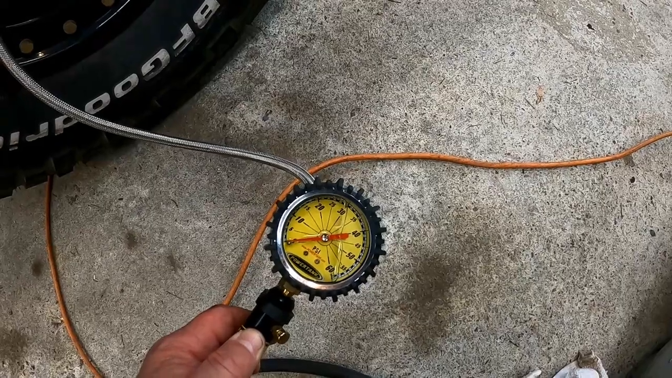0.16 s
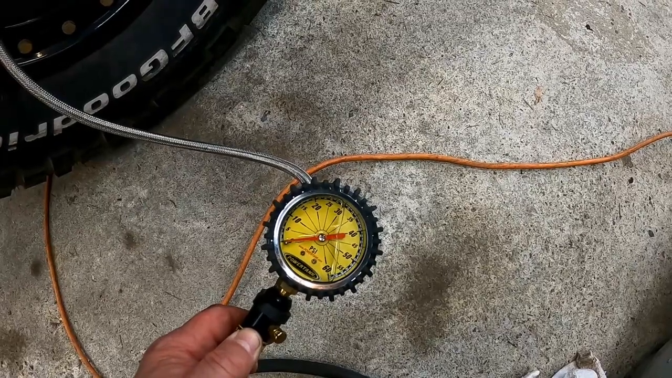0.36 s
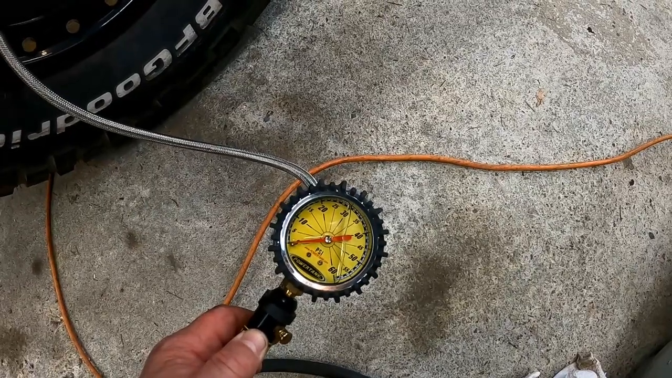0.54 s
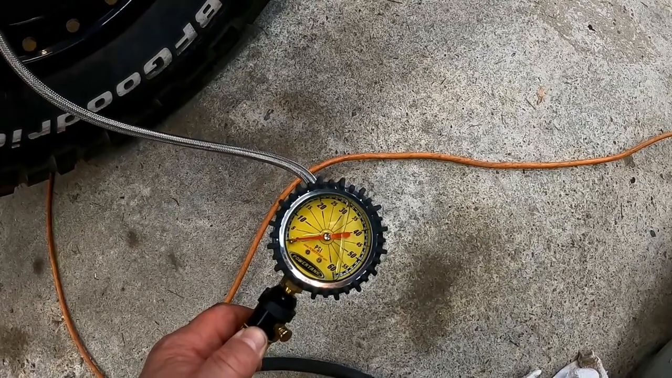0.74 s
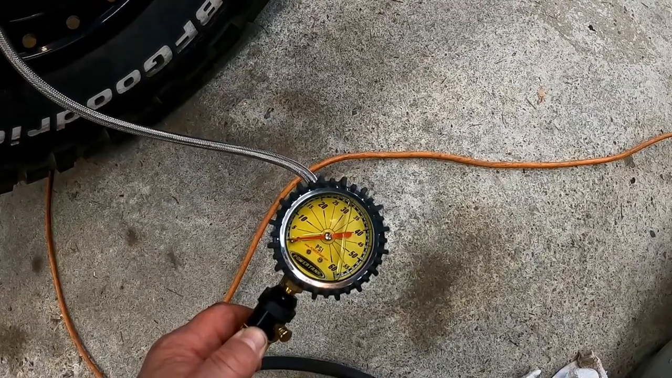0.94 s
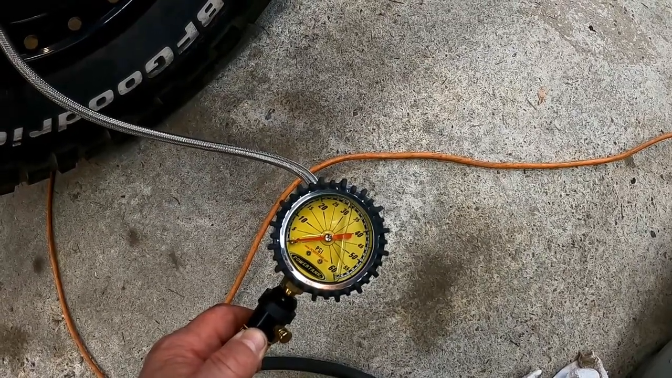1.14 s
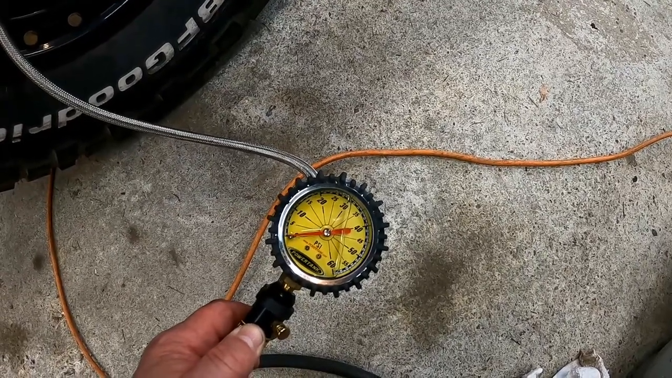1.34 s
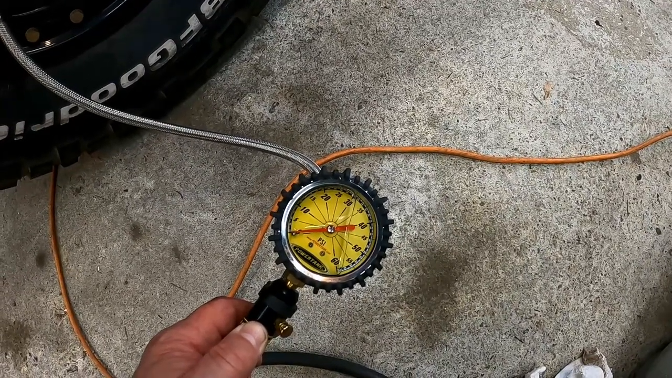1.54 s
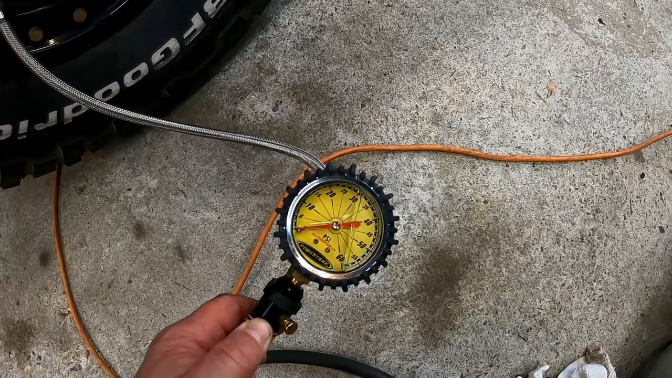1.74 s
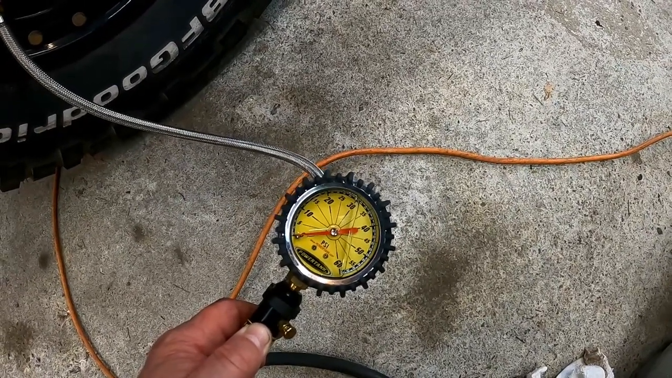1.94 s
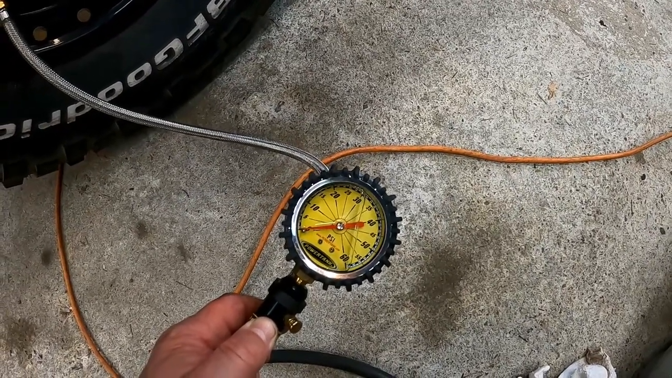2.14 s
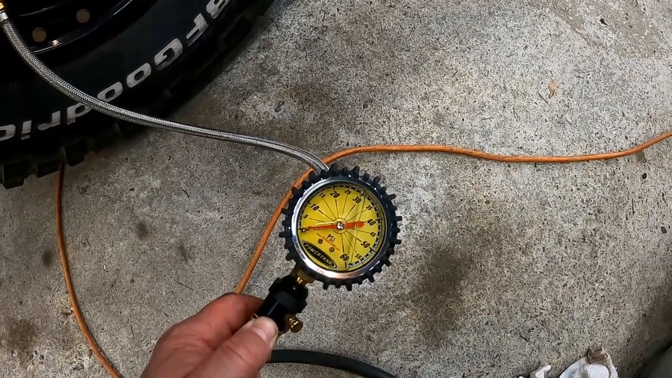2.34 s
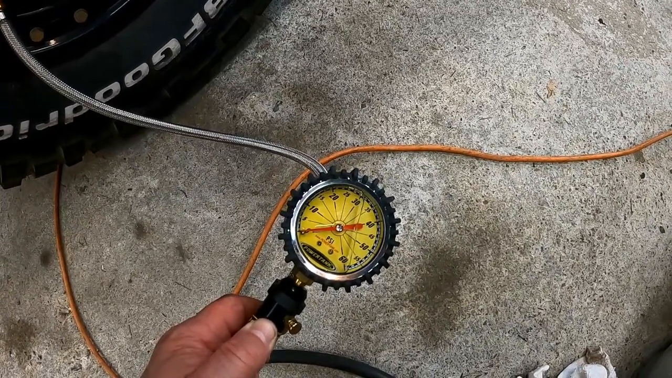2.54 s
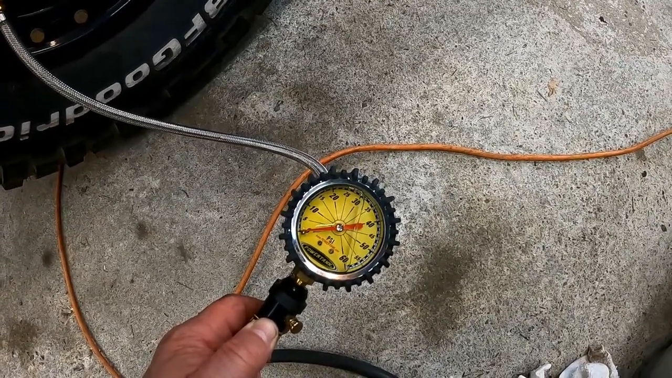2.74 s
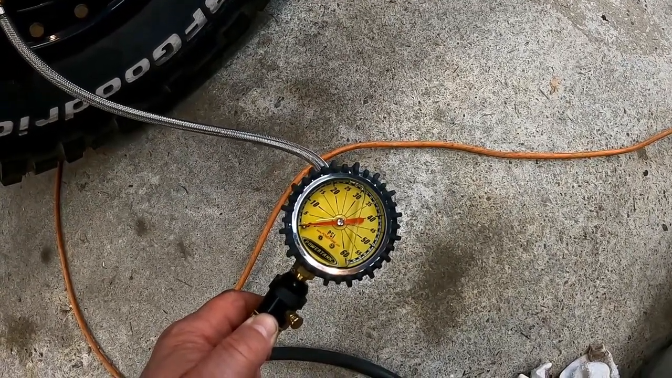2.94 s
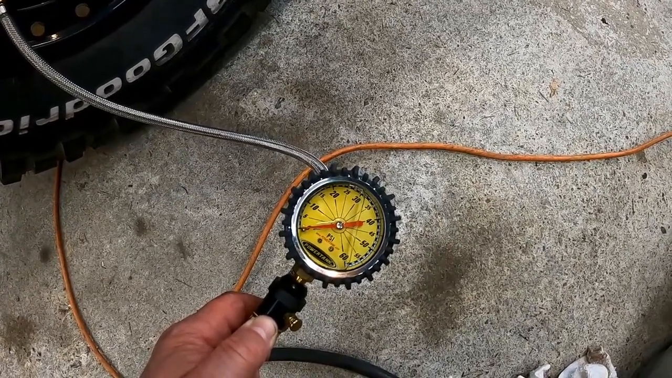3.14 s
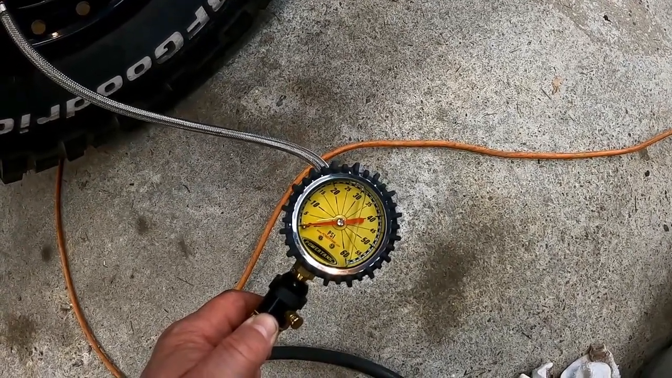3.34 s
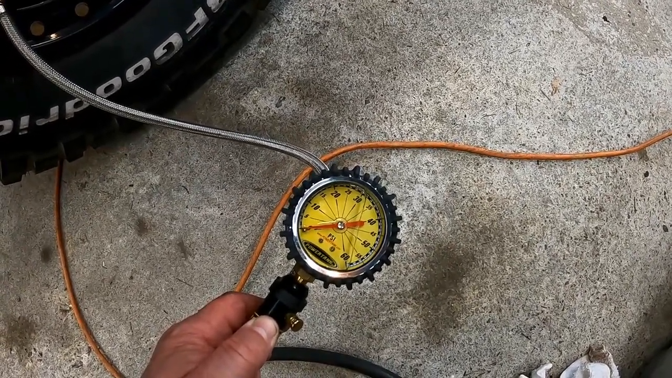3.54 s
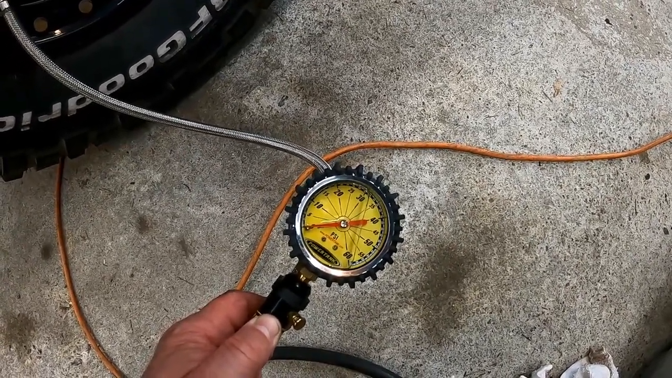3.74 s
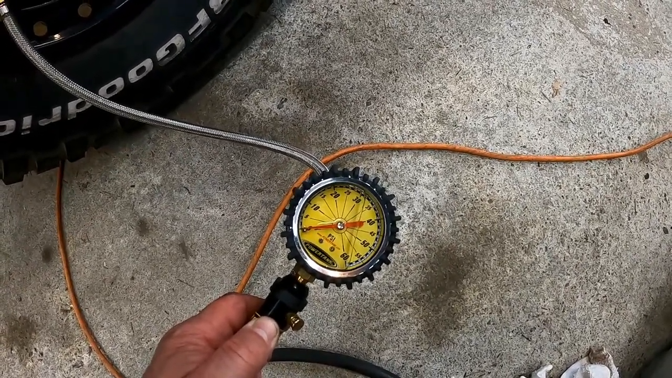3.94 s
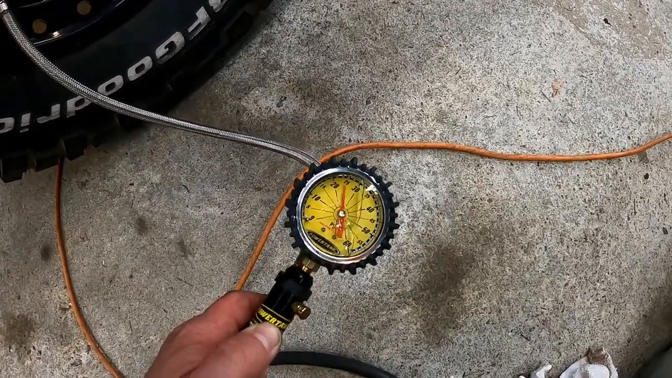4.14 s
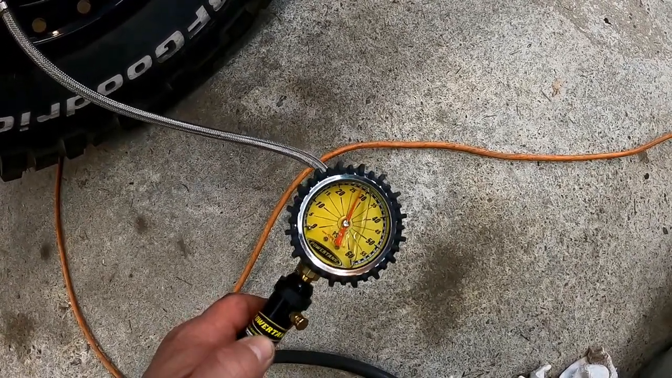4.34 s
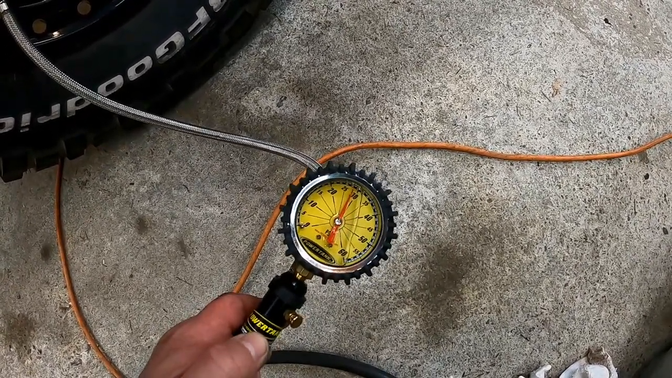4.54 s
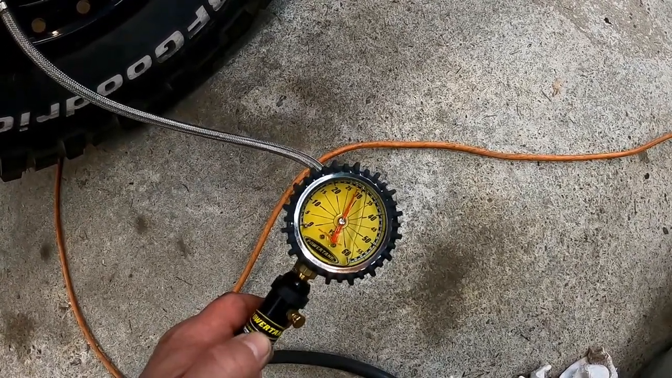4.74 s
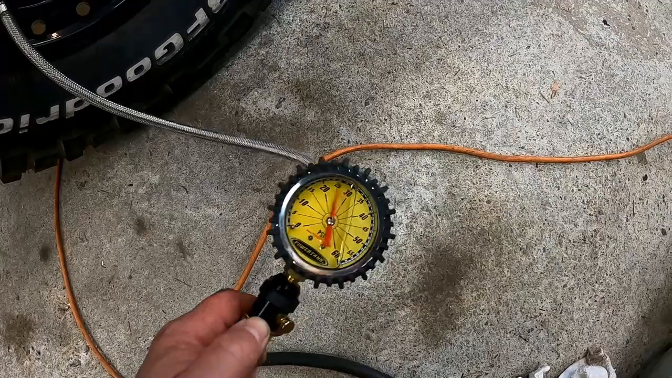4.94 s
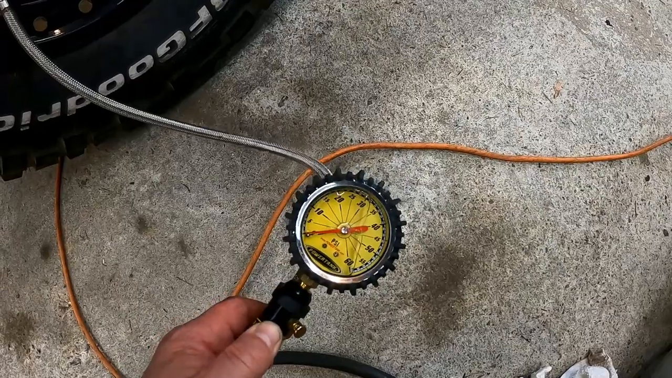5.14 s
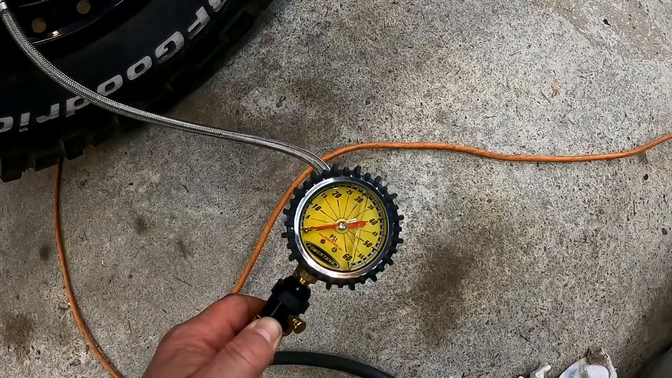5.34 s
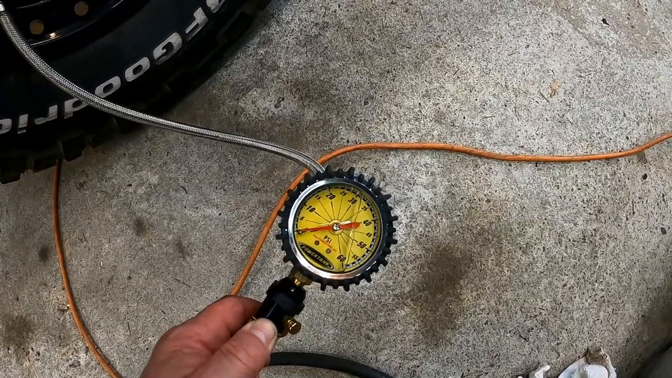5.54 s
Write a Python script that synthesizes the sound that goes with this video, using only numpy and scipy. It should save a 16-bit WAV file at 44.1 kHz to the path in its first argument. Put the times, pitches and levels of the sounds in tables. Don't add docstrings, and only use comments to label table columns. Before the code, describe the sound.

Close, steady hiss of compressed air flowing into a tire through a handheld inflator, with a fine metallic singing inside it. After about four seconds a small click closes the trigger and the flow dies quickly. Faint traffic, wind and distant bird chirps show through. Then a short ragged spit, a hard loud snap with a dull handle thump, and the same hiss resumes. Stereo, close, dry, slightly left.

```python
import sys
import numpy as np
from scipy import signal
from scipy.fft import rfft, irfft, dct, next_fast_len
from scipy.io import wavfile
from scipy.ndimage import map_coordinates

SR = 44100
rng = np.random.default_rng(int(sys.argv[2]) if len(sys.argv) > 2 else 0)


def how_loud(loudness_db):
    steps = np.asarray(loudness_db, float) / 20
    return 10 ** steps


def transcribe(signal):
    frames = np.atleast_2d(signal).T
    limited = np.clip(frames, -1, 1)
    pcm = np.round(limited * 32767).astype(np.int16)
    wavfile.write(sys.argv[1], SR, pcm)


N = 246430
SIZE = next_fast_len(N + SR)
HZ = np.maximum(np.arange(SIZE // 2 + 1) * SR / SIZE, 1)

# f/Hz, density/dB
OUTDOORS_COLOUR = [(12, -54), (20, 5), (54, -9.5), (136, -3.5), (200, 1.5), (346, -8.5), (900, -22),
                   (1520, -29.5), (2400, -36.5), (3100, -38.5), (6000, -40.5), (7800, -36.5), (8800, -47),
                   (10700, -56), (12500, -49.5), (14500, -60)]
# f/Hz, width/Hz, level over traffic/dB
MACHINE_HUMS = [(157.6, 21.7, 6), (255.6, 12.6, 7)]
# t/s, level/dB, half length/s
CAR_PASSES = [
    (.3, -67.5, .3),
    (1.33, -65, 0.11),
    (2.4, -73, .45),
    (5.12, -70, .05),
]
# t/s, level/dB, half length/s
WIND_GUSTS = [
    (0, -61.5, 0.046),
    (.36, -58.5, .06),
    (.81, -64, .04),
    (1.2, -61, 0.057),
    (2.36, -63, 0.036),
    (2.8, -57, 0.093),
    (4.54, -71, 0.028),
    (5.12, -53, 0.052),
]
# f/Hz, likeness/1
OUTDOORS_LIKENESS = [(60, 0.049), (250, 0.65), (1400, 0.2), (6000, 0.04)]
# f/Hz, left minus right/dB
OUTDOORS_BIAS = [(700, 0.0), (2500, 4.0)]
# f/Hz, density/dB
WIND_COLOUR = [(8, -12.5), (25, -14.5), (55, -13.5), (90, -19), (300, -58)]
TRAFFIC_DB, ROAR_FLOOR_DB, WIND_FLOOR_DB = -63, -75.5, -70.5

# t/s, length/s, level/dB
BIRD_WHISTLES = [
    (2.76, .06, -60),
    (2.97, .11, -58),
    (3.2, .1, -57),
    (3.45, .09, -61),
]
# t/s, length/s, start f/Hz, width/Hz, level/dB
BIRD_CHIRPS = [
    (1.05, .13, 2050, 30, -60),
    (1.22, .12, 1960, 30, -60),
    (4.465, .07, 4000, 700, -72),
    (4.55, .055, 2650, 380, -67),
    (4.645, .06, 2450, 100, -74),
    (4.805, .085, 4450, 330, -72),
    (4.935, .07, 3700, 1300, -64),
    (4.94, .07, 2450, 150, -68),
    (5.015, .055, 2650, 250, -62),
]
WHISTLE_HZ, WHISTLE_WIDTH_HZ, WHISTLE_SWELL_S = 2895, 23, 0.036
CHIRP_SAG_PER_S, CHIRP_ONSET_S = .35, .004

# t/s, level/dB, high over low mode/dB, swell time/s
BLOWS = [
    (4.1645, -34.5, 7, 0.00081),
    (5.1252, -16, 9, .0005),
    (5.127, -24, -1, .0008),
    (5.129, -24.5, -6, .00037),
    (5.133, -35, -12, 0.0016),
]
# f/Hz, level/dB, t60/s
HANDLE_THUMP = [(70, -58, .09), (415, -61, .06), (520, -53.5, .07), (690, -49, .06)]
SHUT_MODES_HZ, OPEN_MODES_HZ = (3670, 4750), (3220, 6450)
CRACK_HZ, CRACK_DB = 9500, -18

# f/Hz, density/dB
THIN_SEEP = [(180, -48), (300, -30), (786, -37), (1090, -21), (2510, -18), (5310, -1), (8960, -19.5),
             (13300, -20), (14900, -39)]
# f/Hz, density/dB
FULL_JET = [(180, -47), (300, -38), (749, -27.5), (1070, -11), (1670, -19), (2240, -10), (3000, -11),
            (6360, -2.5), (10000, -15.5), (11100, -13.5), (12000, -19), (13500, -19), (14900, -77)]
POP_S, POP_DB, POP_RISE_DB_PER_S, POP_FALL_DB_PER_S = 5.078, -39.5, 3500, 1202
SPIT_TOP_S, SPIT_DB, SWELL_DB_PER_S, SPIT_HOLD_DB_PER_S = 5.113, -31, 623, 180
SNAP_S, RELEASE_DB_PER_S = 5.126, 856

# f/Hz, density/dB
TURBULENCE = [(500, -53.5), (880, -36.5), (1050, -10.5), (1550, -13), (2000, -13.5), (2500, -12.5),
              (3700, -11), (5400, -7.5), (6600, -7), (8000, -10), (8900, -18), (10300, -12.5),
              (14250, -29.5), (14500, -60)]
# f/Hz, width/Hz, level over plain hiss/dB
HOSE_HUMPS = [(1700, 110, 2), (2036, 250, 5.5), (2420, 140, 5), (2770, 160, 5.5), (3154, 330, 7.5),
              (3420, 160, 8.5), (3864, 85, 10.5), (4430, 290, 2), (5084, 700, 4), (6487, 260, 10),
              (6780, 220, 6.5), (7600, 270, -6.5), (9550, 270, 6), (10130, 280, 5), (10590, 64, 6),
              (10800, 160, 6), (12270, 240, 9), (12950, 240, 5), (13500, 200, 11.5), (14020, 160, 8.5)]
# f/Hz, level/dB rms
WHEEL_MODES = [(1292, -76), (1631, -70), (1744, -73), (1846, -66), (1960, -70), (2030, -67), (2126, -67),
               (2207, -74), (2444, -64), (2772, -69), (2859, -66), (3009, -74), (3424, -66), (3838, -74),
               (3914, -69), (4172, -75), (4312, -73), (4430, -72),
               (1665, -72), (1819, -72), (2064, -68), (2495, -65), (2528, -65), (2470, -69), (2890, -70),
                  (3465, -72), (3400, -71), (2800, -74), (1690, -75)]
# f/Hz, level/dB rms
VALVE_MODES = [(5066, -69), (5168, -73), (5426, -73), (5577, -75), (5712, -75), (5787, -75), (6115, -74),
               (6250, -71), (6460, -63), (6535, -64), (6880, -68), (7214, -75), (7284, -76), (7381, -75),
               (9254, -80), (9884, -82), (10207, -76), (10293, -70), (10578, -78), (11052, -80),
               (11967, -86), (12963, -86), (13415, -90), (13706, -88)]
# f/Hz, density/dB
TIRE_CAVITY = [(1500, -29), (2250, -7), (2500, -1.5), (2800, -9), (3600, -25.5)]
# f/Hz, left minus right/dB
HISS_BIAS = [(60, 10), (110, -2), (200, 2), (370, 2.5), (690, -13), (1260, 5), (2320, 4.5), (4260, 5),
             (7840, 6), (14400, -1.5)]
# f/Hz, likeness/1
HISS_LIKENESS = [(60, -0.0), (130, 0.49), (290, 0.64), (630, 0.24), (1380, 0.56), (3010, 0.41), (6590, 0.3),
                 (14400, 0)]
HISS_DB = -46.5
FLOW_DB, SAG_DB_PER_S = 3, 0.16
SHUT_S, FADE_DB_PER_S, SHUT_DB = 4.178, 91.5, -62
OPEN_S, FIRST_GUSH_S, FULL_S, GUSH_DB = 5.07, 0.028, 0.13, -7

# f/Hz, step re hiss/dB
MASKED_STEP = [(300, -56), (470, -32), (650, -30.5), (900, -32), (1040, -52), (8200, -50), (8900, -33.5),
               (9400, -48), (10800, -44), (11600, -33.5), (14300, -34), (14500, -15)]
# f/Hz, step/dB
QUIET_FLOOR_STEP = [(8000, -105), (9300, -77), (10700, -77), (10900, -70), (14500, -70)]
FRAME, GRID = 1024, 230


def at_hz(points, hz=HZ):
    table = np.array(points)
    return np.interp(np.log(hz), np.log(table[:, 0]), table[:, 1])


def colour(spectrum):
    gain = how_loud(at_hz(spectrum))
    return gain / np.sqrt(np.mean(gain ** 2))


def resonance(hz, width_hz):
    return 1 / (1 + 2j * (HZ - hz) / width_hz)


def drift(rate_hz):
    steps = rng.standard_normal(int(N / SR * rate_hz) + 3)
    return map_coordinates(steps, [np.arange(N) / SR * rate_hz])


def swells(rows, floor_db):
    t = np.arange(N) / SR
    power = how_loud(2 * floor_db) + sum(how_loud(2 * db) * np.exp(-((t - s) / half_s) ** 2) for s, db, half_s in rows)
    return 10 * np.log10(power)


def stereo_noise(envelope, likeness, bias_db):
    mid, side = rfft(envelope * rng.standard_normal((2, N)), SIZE)
    alike = np.clip(likeness, 0, 1)
    pair = np.sqrt((1 + alike) / 2) * mid + np.sqrt((1 - alike) / 2) * side * [[1], [-1]]
    return pair * how_loud(bias_db / 2 * np.array([[1], [-1]]))


def outdoors():
    roar_db, wind_db = swells(CAR_PASSES, ROAR_FLOOR_DB), swells(WIND_GUSTS, WIND_FLOOR_DB)
    hums = np.abs(1 + sum(how_loud(db) * resonance(hz, width_hz) for hz, width_hz, db in MACHINE_HUMS))
    bass = 1 / (1 + (HZ / 320) ** 4)
    low = 1 / (1 + (HZ / 950) ** 6)
    alike, bias_db = at_hz(OUTDOORS_LIKENESS), at_hz(OUTDOORS_BIAS)
    traffic = stereo_noise(how_loud(TRAFFIC_DB - 1.5 + 1.62 * drift(6.9)), alike, bias_db) * bass * hums
    roar = stereo_noise(how_loud(roar_db + 16.5 + 1.5 * drift(2.7)), alike, bias_db) * (low - bass)
    air = stereo_noise(how_loud(-50.0), alike, bias_db) * (1 - low)
    wind = stereo_noise(how_loud(wind_db + 5.7 * drift(14)), .05, 1.7) * colour(WIND_COLOUR)
    return irfft((traffic + roar + air) * colour(OUTDOORS_COLOUR) + wind, SIZE)[:, :N]


def birds():
    out = np.zeros((2, N))
    calls = [(s, length_s, WHISTLE_HZ, WHISTLE_WIDTH_HZ, db, 0) for s, length_s, db in BIRD_WHISTLES]
    calls += [(*chirp, CHIRP_SAG_PER_S) for chirp in BIRD_CHIRPS]
    for s, length_s, start_hz, width_hz, level_db, sag in calls:
        end_hz = start_hz * (1 - sag * length_s)
        t = np.arange(round(1.6 * length_s * SR)) / SR
        blur = rng.standard_normal((3, 2, 1000))
        blur = np.array([[np.interp(t * width_hz * 2.0, np.arange(1000), q) for q in b] for b in blur])
        phase = 2 * np.pi * np.cumsum(np.interp(t, [0, length_s], [start_hz, end_hz])) / SR
        notes = (blur[:, 0] + 30 / width_hz) * np.cos(phase) + blur[:, 1] * np.sin(phase)
        flutter_db = 0.62 * np.interp(t * 60, np.arange(20), rng.standard_normal(20))
        onset = np.clip(t / (CHIRP_ONSET_S if sag else WHISTLE_SWELL_S), 0, 1)
        ending_db = -30 * np.clip(t / length_s - .8, 0, 1) - 12 * sag * t / length_s
        envelope = how_loud(flutter_db + ending_db) * onset
        call = how_loud(level_db) * envelope * (0.96 * notes[0] + 0.79 * notes[1:])
        out[:, round(s * SR):][:, :len(t)] += call
    return out * how_loud([[2.2], [-2.2]])


def trigger():
    out, t = np.zeros(N), np.arange(1000) / SR
    for s, db, high_db, swell_s in BLOWS:
        opening = s > OPEN_S
        low_hz, high_hz = OPEN_MODES_HZ if opening else SHUT_MODES_HZ
        shape = (t / swell_s * np.exp(1 - t / swell_s)) ** 2
        crack = opening * how_loud(CRACK_DB) * np.sin(2 * np.pi * CRACK_HZ * t)
        high = how_loud(high_db) * (np.sin(2 * np.pi * high_hz * t) + crack)
        ring = np.sin(2 * np.pi * low_hz * t) + high
        knock = how_loud(-12.5) * np.sin(2 * np.pi * 1500 * t) * np.exp(-t / 0.0011)
        out[round(s * SR):][:len(t)] += how_loud(db) * (shape * ring + knock)
    t = np.arange(N) / SR - SPIT_TOP_S
    thump = sum(how_loud(db - 60 * np.abs(t) / t60_s) * np.sin(2 * np.pi * hz * t) for hz, db, t60_s in HANDLE_THUMP)
    out += thump * (t > 0)
    return out * how_loud([[.6], [-.6]])


def spit_level_db():
    t = np.arange(N) / SR
    pop = POP_DB - np.maximum(POP_RISE_DB_PER_S * (POP_S - t), POP_FALL_DB_PER_S * (t - POP_S))
    swell = SPIT_DB - np.maximum(SWELL_DB_PER_S * (SPIT_TOP_S - t), SPIT_HOLD_DB_PER_S * (t - SPIT_TOP_S))
    swell -= RELEASE_DB_PER_S * np.maximum(t - SNAP_S, 0)
    swell -= POP_RISE_DB_PER_S * np.maximum(POP_S - t, 0)
    return np.maximum(pop, swell)


def spit():
    t = np.arange(N) / SR
    jet = how_loud(spit_level_db() + 3.0 * drift(400)) * (np.abs(t - 5.13) < .065)
    opened = np.clip((t - 5.088) / 0.0137, 0, 1)
    seep = stereo_noise(jet * np.sqrt(1 - opened), .6, -1.5) * colour(THIN_SEEP)
    full = stereo_noise(jet * np.sqrt(opened), 0.55, 0.23) * colour(FULL_JET)
    return irfft(seep + full, SIZE)[:, :N]


def flow_db():
    t = np.arange(N) / SR
    steady = FLOW_DB - SAG_DB_PER_S * t
    fade = np.maximum(-FADE_DB_PER_S * np.maximum(t - SHUT_S, 0), SHUT_DB)
    back = np.interp(t - OPEN_S, [0, FIRST_GUSH_S, FULL_S], [SHUT_DB, GUSH_DB, 0])
    return steady + np.maximum(fade, back)


def metal(modes, width_hz, gain_db):
    out = np.zeros((2, len(HZ)), complex)
    phases_rad = rng.normal(0, 0.073, len(modes))
    rms_gain = np.sqrt(SR / (np.pi * width_hz))
    for k, ((hz, level_db), phase_rad) in enumerate(zip(modes, phases_rad)):
        top = (-1) ** k * how_loud(level_db + gain_db) * rms_gain
        near = slice(*np.searchsorted(HZ, [hz - 500, hz + 500]))
        mode = top / (1 + 2j * (HZ[near] - hz) / width_hz)
        out[:, near] += mode * np.exp(1j * phase_rad * np.array([[1], [-1]]))
    return out


def hiss():
    level_db = flow_db() + 0.33 * drift(6.7) + 0.077 * drift(25)
    crowd_hz = 1000 + np.cumsum(rng.uniform(12, 52, 410))
    crowd_db = HISS_DB + at_hz(TURBULENCE, crowd_hz) + rng.normal(0, 4, 410)
    crowd = np.c_[crowd_hz, crowd_db]
    humps = np.sqrt(1 + sum((how_loud(2 * db) - 1) * np.abs(resonance(hz, width_hz)) ** 4
                            for hz, width_hz, db in HOSE_HUMPS))
    # (dB of sound per dB of flow, response)
    parts = [(1.39, how_loud(HISS_DB - 9.5) * colour(TURBULENCE) * humps),
             (1.1, metal(crowd, 12, -28.5) * humps),
             (1.08, metal(sorted(WHEEL_MODES), 12, 1.5)),
             (1.7, metal(VALVE_MODES, 9.0, 0.87)),
             (0.46, how_loud(HISS_DB - 12.5) * colour(TIRE_CAVITY))]
    alike, bias_db = at_hz(HISS_LIKENESS) + 0.099, at_hz(HISS_BIAS)
    total = sum(stereo_noise(how_loud(follow * level_db), alike, bias_db) * body for follow, body in parts)
    return irfft(total, SIZE)[:, :N]


def scene():
    return outdoors() + birds() + trigger() + spit() + hiss()


def round_masked(x):
    window, half = np.sin(np.pi * (np.arange(2 * FRAME) + .5) / (2 * FRAME)), FRAME // 2
    padded = np.pad(x, ((0, 0), (2 * FRAME - GRID, 3 * FRAME)))
    blocks = padded[:, :(N // FRAME + 4) * FRAME].reshape(2, -1, FRAME)
    lapped = np.concatenate([blocks[:, :-1], blocks[:, 1:]], axis=2) * window
    a, b, c, d = np.split(lapped, 4, axis=2)
    lines = dct(np.concatenate([-c[..., ::-1] - d, a - b[..., ::-1]], axis=2), type=4, norm="ortho")
    hz = (np.arange(FRAME) + .5) * SR / (2 * FRAME)
    hiss_band = (hz > 1500) & (hz < 8000)
    hiss_level = np.sqrt(np.sum(lines[..., hiss_band] ** 2, axis=(0, 2)) / 2)
    wobble_db = 2.5 * np.repeat(rng.standard_normal((len(hiss_level), FRAME // 4)), 4, axis=1)
    step = hiss_level[:, None] * how_loud(at_hz(MASKED_STEP, hz) + wobble_db) + how_loud(at_hz(QUIET_FLOOR_STEP, hz))
    rounded = np.sign(lines) * np.floor(np.abs(lines) / step + .4) * step
    folded = dct(rounded, type=4, norm="ortho")
    u, v = folded[..., :half], folded[..., half:]
    frames = np.concatenate([v, -v[..., ::-1], -u[..., ::-1], -u], axis=2) * window
    joined = frames[:, 1:, :FRAME] + frames[:, :-1, FRAME:]
    return joined.reshape(2, -1)[:, FRAME - GRID:][:, :N]


def roll_off(x):
    return signal.sosfilt(signal.butter(12, 15010, fs=SR, output="sos"), x)


def record(dry):
    mix = round_masked(dry)
    return roll_off(mix)


dry = scene()
out = record(dry)
transcribe(out)
```